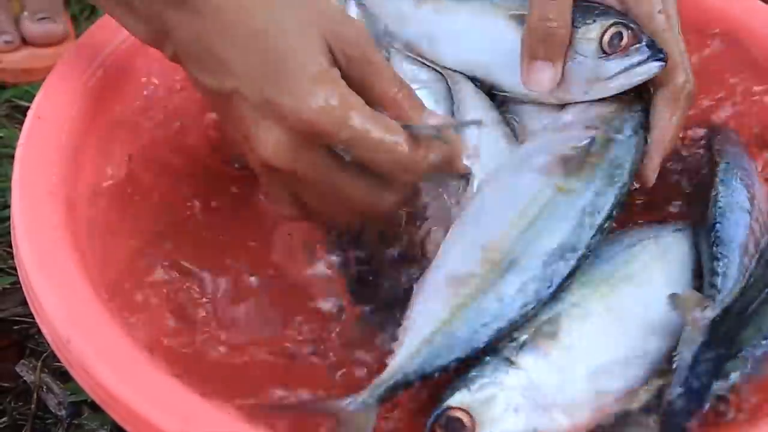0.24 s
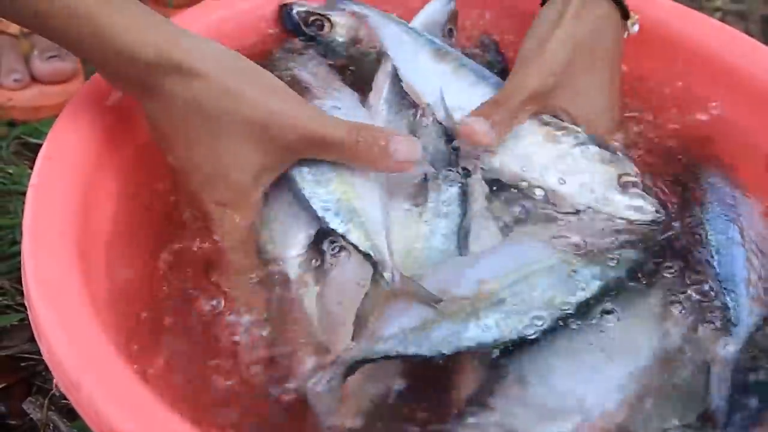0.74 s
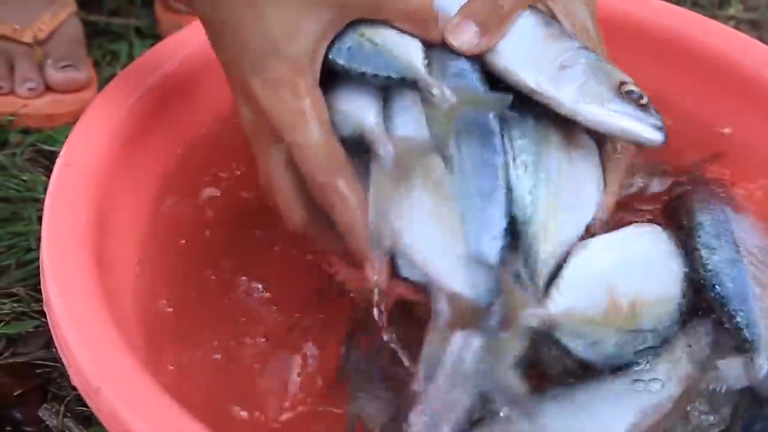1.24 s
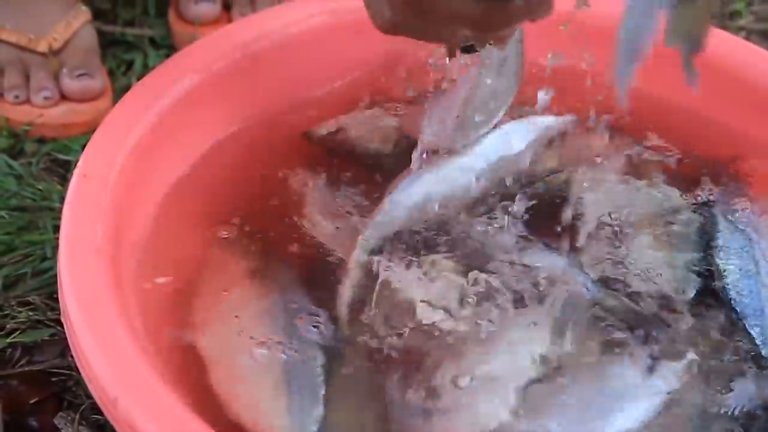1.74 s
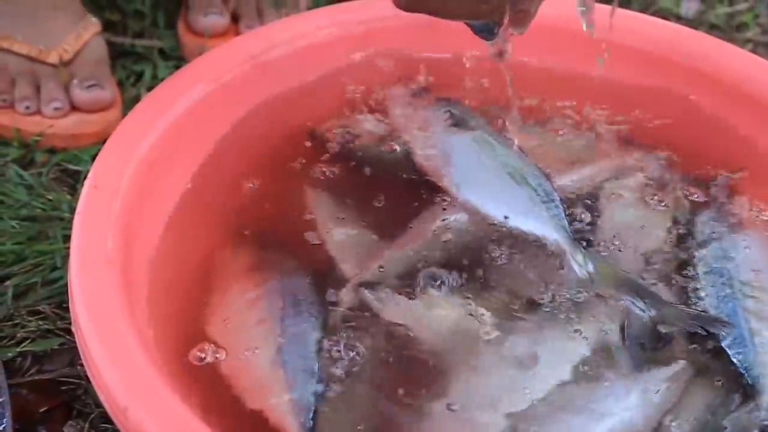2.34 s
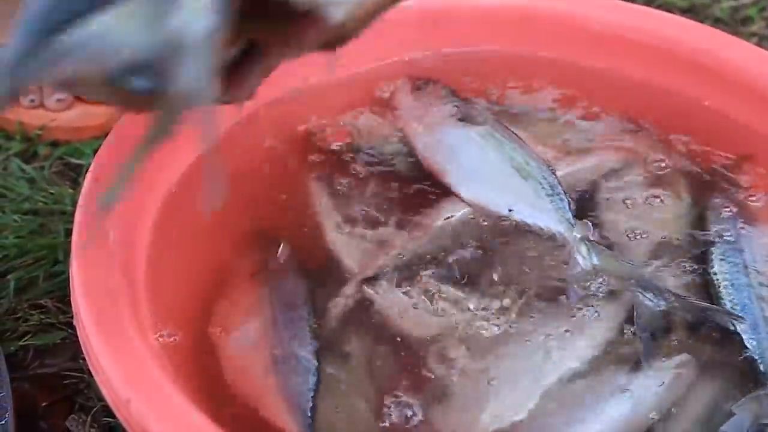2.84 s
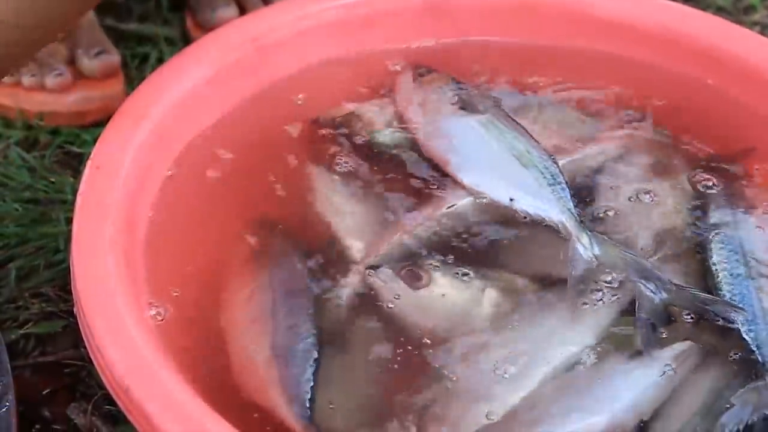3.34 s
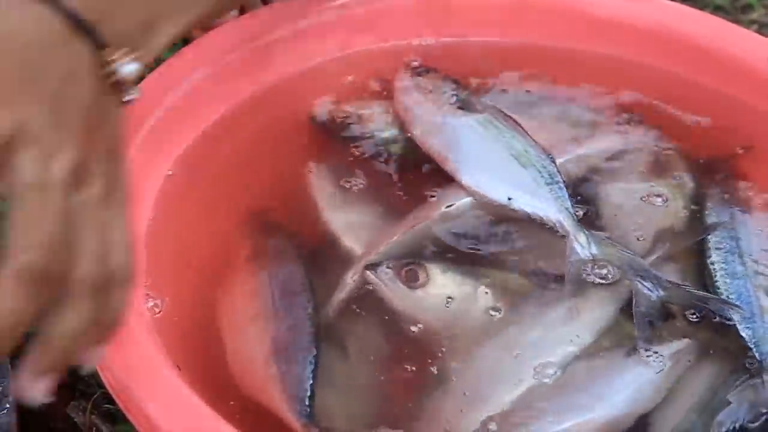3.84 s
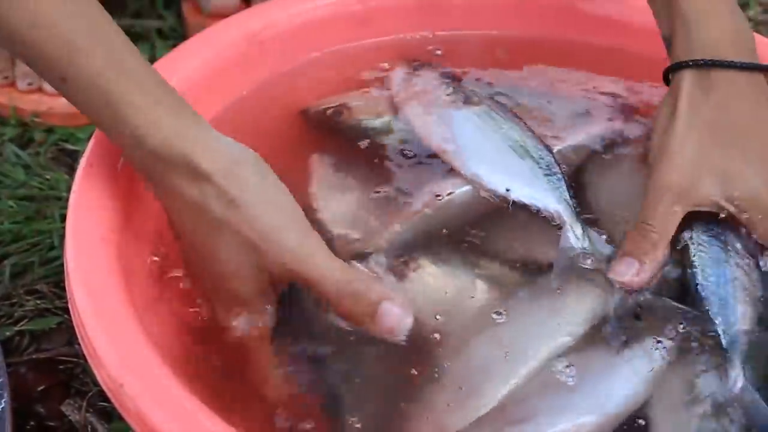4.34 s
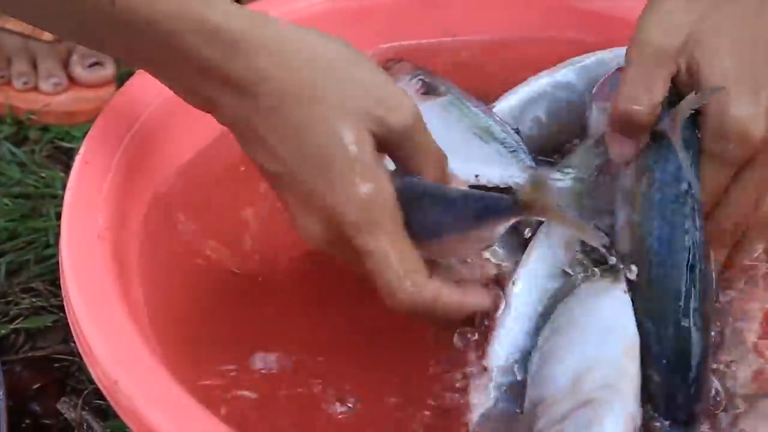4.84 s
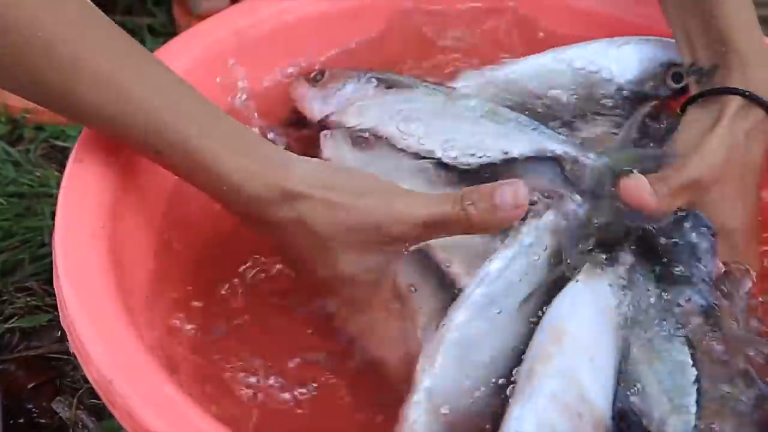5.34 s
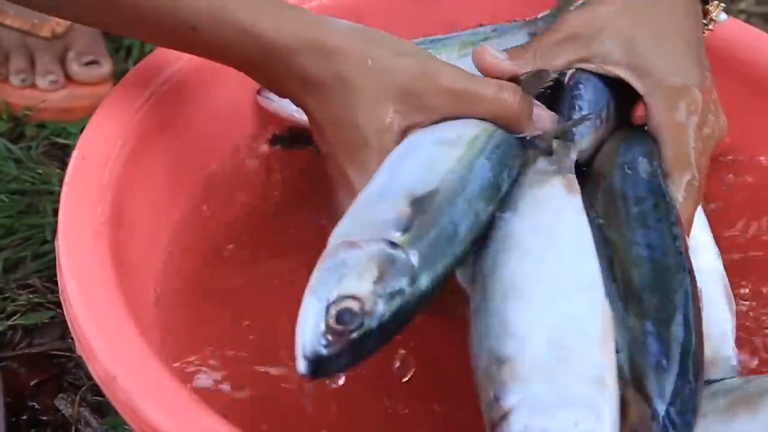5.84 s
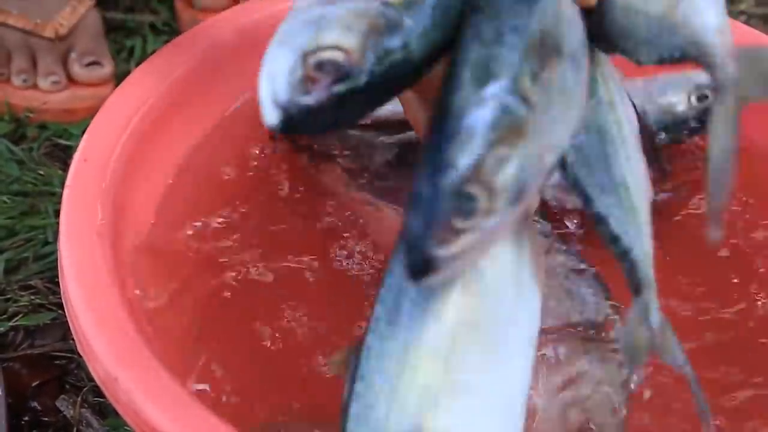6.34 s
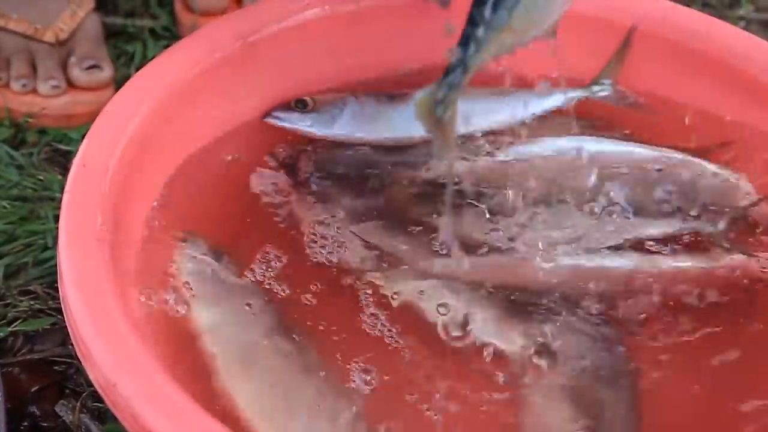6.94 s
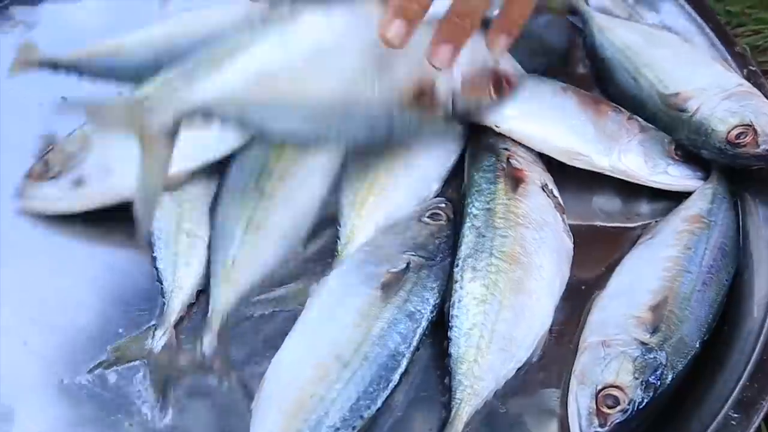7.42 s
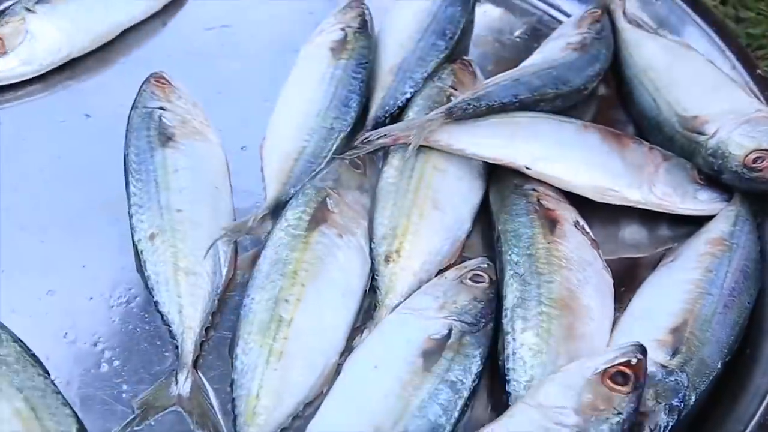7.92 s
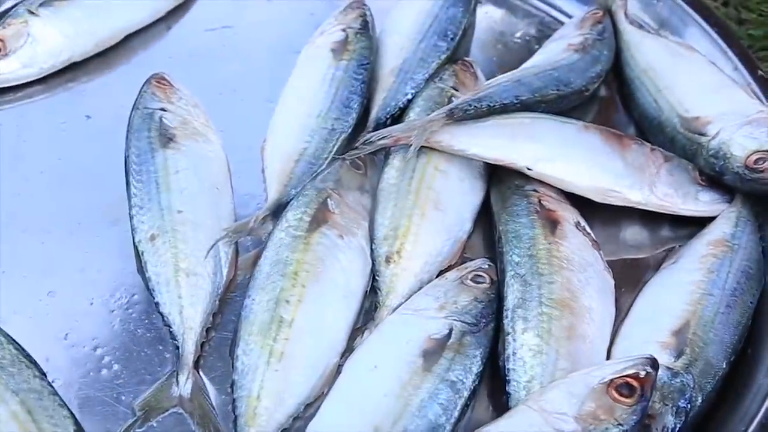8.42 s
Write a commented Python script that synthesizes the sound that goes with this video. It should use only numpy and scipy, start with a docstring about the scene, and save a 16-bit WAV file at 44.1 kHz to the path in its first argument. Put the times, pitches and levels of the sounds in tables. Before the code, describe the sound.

Close, dry outdoor sound with soft hiss and lumpy low wind rumble. From 0 to 2.2 s hands work wet fish through water in a plastic basin: busy gurgles, swishes, short bubble plops mostly rising in pitch, and sharp droplet ticks. It thins to small drips and fizz by 2.8 s. Around 3.5 to 3.9 s a handful of fish lands on a steel tray, dull wet thuds with faint metal ring. Washing resumes near 4.2 s, densest from 4.7 to 5.9 s, with snappy splashes at 6.2 and 6.7 s, then easing. Sound drops nearly silent at 7.15 to 7.23 s. From 7.45 to 7.8 s harder fleshy slaps hit the tray, the strongest at 7.55 s, with spatter. Wet slithering, a few small bubbles and stronger wind buffeting finish by about 8.7 s. Tiny hoarse bird chirps sound far off, clearest near 8 s.

```python
"""Outdoors, hands wash fish in a plastic basin: air pockets ring, most rising in pitch, and droplets tick.
Dense small chirps make the water gurgle and fizz; noise gives its swish, spray and foam.
Twice a handful of wet fish lands on a steel tray: dull thuds and wet noise, with a faint metal ring.
Wind buffets the microphone in low noise over a soft hiss, and gliding tones make far-off bird calls.
The sound drops out for a moment before the last part."""
import sys
import numpy as np
from scipy import signal
from scipy.io import wavfile

SR = 44100
rng = np.random.default_rng(int(sys.argv[2]) if len(sys.argv) > 2 else 0)


def unload_wav(signal):
    """Save mono or channel-first audio to the path in sys.argv[1] as 16-bit WAV at rate SR, clipped to [-1, 1]."""
    wavfile.write(
        sys.argv[1],
        SR,
        np.round(np.clip(np.atleast_2d(signal).T, -1, 1) * 32767).astype(np.int16),
    )


def volts_from_decibels(level):
    """Turn decibel levels (scalar or array-like) into linear amplitude factors."""
    exponent = np.asarray(level, float) / 20
    return 10 ** exponent


N = 382788


def noise():
    """White noise as long as the scene."""
    return rng.standard_normal(N)


def unit(x):
    """Scales a sound to an rms of 1."""
    return x / np.sqrt(np.mean(x ** 2) + 1e-20)


def band(x, low_hz, high_hz, order=2):
    """Keeps the part of a sound between two frequencies."""
    edges_hz = [low_hz, min(high_hz, 0.45 * SR)]
    return signal.sosfilt(signal.butter(order, edges_hz, "band", fs=SR, output="sos"), x)


def drift(rate_hz):
    """Slow random wandering of rms 1: noise through a two-pole lowpass, worked out every 40 samples."""
    pole = np.exp(-2 * np.pi * rate_hz * 40 / SR)
    settle = 2000
    slow = signal.lfilter([1], [1, -2 * pole, pole ** 2], rng.standard_normal(N // 40 + 2 + settle))[settle:]
    return np.interp(np.arange(N) / 40, np.arange(len(slow)), unit(slow))


def add(out, start_s, piece):
    """Mixes a short sound into a longer one, cut off at the end."""
    at = int(start_s * SR)
    out[at:at + len(piece)] += piece[:N - at]


def sweep(pitch_hz):
    """A sine that follows a changing pitch: its phase is the running sum of the pitch."""
    return np.sin(2 * np.pi * np.cumsum(pitch_hz) / SR)


def swells(rows, rise_db_s, fall_db_s, rest_db, upper_rest_db):
    """Each event rises, holds and falls above a resting level; gives gains for a main and an upper layer."""
    t = np.arange(0, N, 40) / SR
    start, hold, db, above_db = np.transpose(rows)[:, :, None]
    rise = rise_db_s * np.maximum(start - t, 0)
    fall = fall_db_s * np.maximum(t - start - hold, 0)
    shape = db - rise - fall
    gains = []
    for level, rest in ((shape, rest_db), (shape + above_db, upper_rest_db)):
        power = volts_from_decibels(2 * rest) + volts_from_decibels(2 * level).sum(axis=0)      # overlapping events add in power
        gains.append(np.interp(np.arange(N) / SR, t, np.sqrt(power)))
    return gains


def air():
    """Soft outdoor hiss: half-octave noise bands, each wavering a little."""
    # shape of the hiss: (pitch_hz, relative level_db per hz)
    hiss_shape = [(200, 6), (420, 3), (630, -2.5), (1330, -6), (2500, -14.5), (5500, -14), (8600, -18.5),
                  (10500, -22), (16000, -18)]
    hz, db = np.transpose(hiss_shape)
    edges_hz = 200 * 2 ** np.arange(0, 6.6, 0.5)
    white = rng.standard_normal((2, N))      # neighbouring bands take turns
    out = 0
    for k, (low, high) in enumerate(zip(edges_hz, edges_hz[1:])):
        level = np.interp(np.log(low * high) / 2, np.log(hz), db) + 0.8 * drift(3.9)
        out = out + volts_from_decibels(level) * band(white[k % 2], low, high)
    return volts_from_decibels(-51) * unit(out)


def wind():
    """Gusts on the microphone are lumpy low noise: a deep buffet and a faster flutter."""
    # gusts: (start_s, hold_s, buffet level_db, flutter level_db above the buffet)
    gusts = [(0, 0.013, -36, -5), (.58, 0.034, -31.5, -21.5), (1.14, 0.076, -29, -20),
             (1.41, 0.035, -32.5, -10), (1.69, 0.049, -23.5, -25), (1.9, 0.22, -25, -21.5),
             (2.37, 0.12, -21.5, -23), (2.6, 0.067, -23.5, -23.5), (2.98, 0.024, -22, -51),
             (3.19, .06, -20, -4), (3.27, 0.088, -14.5, -49), (3.53, 0.069, -25, -7),
             (3.72, 0.15, -24, -26), (4.06, 0.05, -25.5, -34), (4.24, 0.15, -23, -25.5),
             (4.5, 0.036, -29, -11), (4.63, 0.14, -24, -18), (4.92, 0.11, -28, -22),
             (5.13, 0.03, -21, -22.5), (5.25, 0.098, -25, -39), (5.44, .25, -25.5, -25.5),
             (5.78, .15, -23, -41), (6.04, 0.066, -26.5, -29), (6.57, .04, -30, -15),
             (6.84, 0.21, -23.5, -11.5), (7.12, .03, -29, -9), (7.36, 0.17, -20, -8.5),
             (7.69, 0.13, -19.5, -4), (7.92, 0.12, -22, -9), (8.1, .1, -18.5, -6), (8.37, 0.18, -24, -5.5),
             (8.64, 0.047, -21, -12)]
    gusting, fluttering = swells(gusts, rise_db_s=219, fall_db_s=141, rest_db=-42, upper_rest_db=-48.5)
    deep = band(band(noise(), 20.4, 28.7, order=1), 7.4, 113.4) * volts_from_decibels(2.4 * drift(23))
    flutter = band(band(noise(), 52, 134), 38, 246) * volts_from_decibels(3.0 * drift(15))
    return gusting * unit(deep) + fluttering * unit(flutter)


def small_bubbles(per_s, low_hz, octaves, tilt_db, spread_db, clump_db, climb, count):
    """Countless small air pockets, each a short rising chirp, born in clumps; rms 1."""
    out = np.zeros(N)
    crowd = volts_from_decibels(clump_db * drift(20))
    for at, keep, size, key, life, haste in rng.random((count, 6)):
        if keep * count < per_s * crowd[int(at * N)] * N / SR:
            hz = low_hz * 2 ** (octaves * key)
            cycles = 12 + 55 * life ** 1.5      # cycles until 60 dB down
            t = np.arange(int(cycles / hz * SR)) / SR
            pitch = hz * 2 ** (climb * haste ** 2 * hz * t)
            size_db = -spread_db * np.log(size + 0.0073)      # a few are much louder
            height = volts_from_decibels(size_db - 60 * t * hz / cycles + tilt_db * key)
            add(out, at * N / SR, height * sweep(pitch))
    return unit(out)


def crackle():
    """Separate spits of spray: each opens a dying puff of noise in one of three treble ranges; rms 1."""
    per_s, t60_s = 330, 0.0061
    sizes = volts_from_decibels(6.0 * np.minimum(rng.exponential(1, N), 4))
    born = rng.random(N) < per_s * volts_from_decibels(7.5 * drift(30)) / SR
    dealt = rng.integers(0, 3, N)
    fade = volts_from_decibels(-60 / (t60_s * SR))
    out = 0
    for k, (low_hz, high_hz, db) in enumerate([(3750, 9100, -4.5), (6500, 9250, 3.0), (7860, 18400, -3.5)]):
        puffs = signal.lfilter([1], [1, -fade], sizes * born * (dealt == k) + 1e-18)
        out = out + volts_from_decibels(db) * unit(band(puffs * noise(), low_hz, high_hz))
    return unit(out)


def stirred_water():
    """Small bubbles gurgle over a soft swish; tiny ones fizz among spits of spray and a thin hiss of foam."""
    # strokes of the hands through water or among wet fish:
    # (start_s, hold_s, gurgle level_db, fizz level_db above the gurgle)
    strokes = [(.06, 0.069, -39, -5.5), (.18, 0.08, -35.5, 1.5), (.37, 0.05, -35.5, 0.5),
               (.53, 0.14, -34.5, -8.5), (.87, 0.56, -50, -2), (1.2, .18, -40.5, -8.5),
               (1.42, 0.19, -38, 1), (1.74, 0.12, -44, 3), (2, 0.18, -46, -1.5), (2.36, 0.07, -54.5, 7.5),
               (2.52, 0.061, -47.5, -8), (2.8, 0.055, -59.5, 10), (3.15, .2, -53, -6),
               (3.53, 0.096, -35.5, -17.5), (3.78, .06, -46, -4), (4.2, .22, -38.5, -13),
               (4.55, 0.14, -46, -8), (4.75, 0.11, -32, -3.5), (5.03, 0.099, -32.5, -11),
               (5.3, 0.18, -40.5, -4), (5.57, 0.14, -36.5, -1), (5.72, 0.13, -38, -13),
               (5.97, .2, -43.5, -12.5), (6.29, 0.16, -35.5, -7), (6.7, 0.051, -45, 8.5),
               (7.08, 0.21, -47, 0.5), (7.27, 0.07, -52, 1), (7.46, 0.12, -36, -5), (7.7, 0.24, -47.5, -3),
               (7.88, 0.18, -42.5, -1), (8.19, 0.13, -32, -17), (8.4, 0.2, -35.5, -12)]
    # hands in the water: (start_s, end_s)
    washing = [(0, 2.8), (4.16, 7.2)]
    gurgling, fizzing = swells(strokes, rise_db_s=230, fall_db_s=108, rest_db=-66, upper_rest_db=-54.5)
    gurgle = small_bubbles(560, low_hz=800, octaves=2.256, tilt_db=5.5, spread_db=6.0,
                           clump_db=4.0, climb=0.0325, count=9000)
    swish = volts_from_decibels(-11 + 7.8 * drift(28.3)) * unit(band(noise(), 770, 2340, order=1))
    fizz = small_bubbles(520, low_hz=1935, octaves=2.16, tilt_db=7.5, spread_db=6.5,
                         clump_db=4.0, climb=0.017, count=12000)
    foam = volts_from_decibels(-20) * unit(band(noise(), 2300, 5800, order=1))
    t = np.arange(N) / SR
    hands = sum((t >= start) & (t < end) for start, end in washing)
    # away from the water, fish slither on the wet tray
    slide = (1 - hands) * unit(band(noise(), 2300, 3670, order=1))
    low = hands * gurgle + swish
    high = volts_from_decibels(-5.5) * crackle() + hands * fizz + foam + volts_from_decibels(-5) * slide
    return gurgling * low + fizzing * high


def bubbles():
    """Air pockets ring up within half a cycle; most climb in pitch near the surface, where they burst."""
    # the larger air pockets caught in the water:
    # (start_s, level_db before fading, pitch_hz at the start, t60_s to fade 60 dB, rise in octaves per s)
    pockets = [(.023, -26, 1470, 0.026, 5.5), (.0505, -20, 2400, 0.021, 30), (0.0572, -24, 898, .12, 28.5),
               (.0694, -18, 1244, 0.07, -3), (0.0806, -19, 977, 0.076, 6), (0.1515, -16.5, 1800, 0.024, 58),
               (.168, -29, 797, 0.12, -2), (.202, -25, 553, 0.16, 14), (0.2032, -12, 1212, 0.075, 6.5),
               (.218, -23, 1185, 0.1, 13), (0.225, -19, 2660, .021, 41), (.229, -14.5, 1990, .034, 2),
               (0.2374, -9, 2960, .0032, 0), (0.249, -23, 965, 0.11, -1.5), (.338, -30.5, 800, 0.083, 16),
               (.3648, -23.7, 2580, .021, 18), (.3755, -21, 3460, .01, 78), (0.3957, -22, 2140, .027, 17),
               (0.406, -20, 1330, 0.029, -2), (0.4273, -17.5, 1100, 0.055, 42),
               (.434, -17, 1110, 0.025, 31), (0.5156, -30, 1116, .025, 2), (.517, -22, 2290, .02, -2),
               (.5401, -17.5, 4166, .0083, 92), (.5695, -24.5, 660, 0.13, 1), (.581, -13, 1940, 0.0092, 6),
               (0.589, -17, 1162, 0.034, 9), (.5908, -30.5, 668, 0.3, 4.5), (.6275, -13, 3246, .004, 0),
               (.67, -18, 1680, .018, 12), (0.6755, -23, 1280, .039, 32), (.681, -6, 2750, .021, 29),
               (.73, -26, 1280, 0.039, 38), (0.785, -26, 645, 0.038, -1), (0.9827, -7.5, 1260, 0.0017, 0),
               (1.0584, -29.5, 1060, .053, 31), (1.091, -24.5, 1960, 0.017, 6),
               (1.1696, -15, 1710, 0.015, 46), (1.186, -25, 2140, 0.018, 4), (1.2415, -22, 2285, 0.021, 0),
               (1.2432, -10, 840, 0.013, 3), (1.266, -15.5, 1060, 0.032, -16),
               (1.29, -17.5, 1430, 0.029, 2), (1.35, -21, 704, .02, -2), (1.367, -22.5, 660, 0.049, 21),
               (1.3813, -19, 1180, 0.017, 2), (1.3892, -25, 1100, .045, 4), (1.411, -26, 746, .084, 7),
               (1.4345, -25, 3085, .018, 42), (1.4466, -17.5, 3400, 0.017, 0), (1.501, -22, 1318, .02, 5),
               (1.5176, -23, 1793, .019, 20), (1.52, -13, 1005, 0.035, -8), (1.5493, -26, 1034, 0.11, 24),
               (1.556, -14.5, 2770, 0.012, -16), (1.5708, -11.5, 1430, 0.01, 0),
               (1.611, -15.5, 2746, 0.012, 5), (1.645, -20.5, 1030, 0.028, -5),
               (1.662, -10.5, 2650, .0068, 0), (1.74, -19.5, 3900, 0.016, -1),
               (1.7634, -20, 1180, .026, 47), (1.7774, -22, 1990, .033, 19),
               (1.7905, -14.5, 1880, 0.012, 0), (1.7878, -12.5, 1505, 0.032, 9),
               (1.8216, -26.5, 1053, 0.15, 15), (1.842, -13.5, 2760, .011, 17),
               (1.8456, -22, 1460, .026, 55), (1.913, -23, 1590, .061, -2.5), (1.932, -28, 600, .013, 0),
               (2.001, -32, 2020, .033, -6), (2.0301, -14.7, 1290, 0.054, 66),
               (2.0586, -21.5, 860, 0.13, 5.5), (2.0771, -26.7, 888, 0.16, 26),
               (2.1376, -20, 960, 0.074, 7), (2.1517, -19, 4500, .01, 0), (2.1668, -18.5, 930, .12, 10.5),
               (2.2409, -19, 3350, 0.02, 2), (2.45, -24.5, 1630, 0.019, 0), (2.4644, -30.5, 1374, 0.043, 7),
               (2.5214, -21, 2780, 0.028, 88), (2.522, -25.5, 1285, 0.034, 6),
               (2.5447, -25, 1240, 0.052, 10), (2.588, -23.5, 1147, 0.052, 8),
               (2.5946, -29, 1456, 0.059, -2), (2.636, -40, 1190, 0.065, 3), (2.638, -29, 3370, 0.017, 20),
               (4.1839, -5.5, 850, .0075, -6), (4.3958, -12.5, 1481, 0.0067, 4),
               (4.404, -9, 2381, 0.0015, 0), (4.4195, -8.5, 3382, 0.003, 44), (4.44, -21, 1413, 0.054, 25),
               (4.444, -16, 2460, .02, 67), (4.4534, -21, 1950, .042, 43), (4.6545, -12, 2180, 0.0069, -4),
               (4.6722, -26, 1870, 0.061, 0), (4.6987, -15, 2300, 0.0084, 117),
               (4.7369, -21, 1820, .028, -3), (4.744, -18, 2640, 0.021, 26), (4.7515, -14.5, 2800, .015, 4),
               (4.752, -23, 800, .07, 1), (4.753, -19, 1597, .022, -5), (4.761, -22, 1100, .047, 22),
               (4.781, -13, 1650, .013, 0), (4.7897, -20, 813, .18, 6.5), (4.863, -21, 2150, 0.06, 19),
               (4.8675, -17, 4870, .017, 15), (4.8812, -22, 950, .044, 25), (4.9046, -22, 1740, .051, 3),
               (4.919, -21.5, 1384, 0.064, 66), (4.98, -24, 1390, .034, 0), (5.017, -21.5, 464, 0.041, 1),
               (5.0352, -17, 840, 0.062, 11), (5.038, -2, 3050, 0.0057, 62),
               (5.0445, -11.5, 4480, 0.019, -5), (5.066, -17.5, 904, 0.048, 27),
               (5.0655, -19, 2014, 0.035, 23), (5.0955, -8, 1740, .008, 2), (5.0963, -12.5, 2530, .019, 35),
               (5.14, -18, 1970, 0.053, 55), (5.1537, -5, 2961, .0041, 0), (5.1599, -10.5, 1134, 0.029, 18),
               (5.175, -18, 1510, 0.036, 55), (5.227, -26.5, 1490, 0.04, 5), (5.3607, -29, 1710, .052, 1),
               (5.453, -17, 1090, 0.082, 50), (5.573, -2.5, 3180, .0079, 29), (5.573, -12, 4120, 0.014, 17),
               (5.6258, -10, 1560, 0.008, -2), (5.6433, -16.5, 1166, 0.054, -9),
               (5.6541, -9, 2250, 0.027, -3), (5.661, -18, 1440, .03, 0), (5.6805, -10, 1560, 0.042, 9.5),
               (5.6954, -22, 1370, .047, 25), (5.704, -16, 1340, 0.066, 4), (5.748, -13, 2172, 0.014, 76),
               (5.7525, -23, 1400, 0.075, 2), (5.7694, -7, 910, 0.011, 3), (5.7892, -18, 1540, 0.052, -4.5),
               (5.8063, -20.5, 1260, 0.084, 28), (5.8409, -15.5, 1110, 0.048, -4),
               (5.843, -16, 1940, .026, 3), (5.849, -26, 1503, 0.095, 1.5), (5.9, -30, 1300, .06, -2),
               (5.98, -33, 1220, 0.021, -2), (6.0487, -21, 4680, .014, -7), (6.0631, -20, 2960, 0.029, -6),
               (6.1983, -19, 690, 0.034, 0), (6.2016, -9, 2930, 0.0048, 0), (6.2047, -7, 5000, .0045, 177),
               (6.2995, -16, 2850, .0087, 63), (6.3135, -12.5, 1930, .0063, 101),
               (6.3307, -21.5, 800, 0.029, 9), (6.377, -16.5, 524, 0.026, -6),
               (6.4032, -20, 3900, 0.017, -8), (6.4266, -7.5, 1182, .05, 7.5),
               (6.4333, -13.5, 1157, 0.079, -1), (6.452, -19, 1090, 0.085, -0.5),
               (6.667, -32, 1265, .12, 1), (6.717, -17, 4460, .012, 7), (6.7293, -5.5, 2010, .01, 7),
               (6.7302, -7.5, 510, 0.017, -20), (6.7317, -1, 1030, 0.0024, 4),
               (6.774, -19.5, 410, 0.045, -15), (6.8216, -22.5, 4040, .018, 6),
               (7.018, -23.5, 2490, .03, -11), (7.082, -25.5, 1410, 0.052, -4.5),
               (8.185, -25.5, 1180, .035, 42), (8.1928, -15, 1250, 0.0099, 7), (8.1925, -26, 784, 0.048, 0),
               (8.2136, -27.5, 1260, 0.091, 4), (8.216, -26.5, 1880, .027, 62),
               (8.436, -17.5, 763, 0.025, -2), (8.4457, -23, 840, .021, 3), (8.5491, -5.5, 1901, 0.0012, 0),
               (8.6447, -33, 1046, 0.069, 11.5), (8.659, -30, 1664, 0.023, 5)]
    out = np.zeros(N)
    for start, db, hz, t60, rise in pockets:
        t = np.arange(int(t60 * SR)) / SR
        octaves = np.minimum(rise * t, 1.5)
        burst_db = 3 * octaves ** 2      # extra fading as the pitch moves away
        level = volts_from_decibels(db - 60 * t / t60 - burst_db) * np.minimum(2 * hz * t, 1)
        add(out, start, level * sweep(hz * 2 ** octaves))
    return out


def ticks():
    """A droplet bursts: a broad snap and a brief coloured hiss, both of dying noise."""
    # the louder droplets: (start_s, level_db before the common trim below, colour_hz)
    droplets = [(0.0677, -18.5, 13100), (0.187, -18, 5130), (0.215, -18, 7320), (0.2977, -19, 7560),
                (0.3645, -16.5, 5040), (0.436, -10, 5400), (0.4984, -22, 8600), (0.5166, -19, 5130),
                (0.573, -17, 6600), (0.617, -12, 7840), (0.6262, -12, 4900), (0.636, -14.5, 6130),
                (0.7592, -25, 5570), (0.8145, -25, 8400), (1.1032, -22, 9700), (1.38, -18, 7460),
                (1.4509, -11.5, 7590), (1.5224, -14, 6600), (1.5554, -12.5, 7210), (1.5712, -18, 6910),
                (1.5897, -14, 5700), (1.661, -23, 7840), (1.708, -14.5, 5400), (1.7384, -18.5, 7900),
                (1.7764, -16, 8350), (1.9008, -18, 6200), (1.981, -18, 5240), (2.2066, -20, 8200),
                (2.3192, -25, 7160), (2.378, -23, 12700), (2.4119, -23.5, 6900), (2.5202, -30, 7280),
                (2.5435, -27.5, 8950), (2.599, -25, 13000), (2.779, -30, 5230), (2.804, -33, 8500),
                (2.977, -32, 9020), (3.1627, -30, 13000), (3.3543, -35, 5730), (3.547, -23, 7520),
                (3.5644, -18, 8950), (3.6442, -12.5, 9200), (3.799, -18.5, 5280), (3.8207, -16, 7360),
                (4.1832, -14.5, 4960), (4.35, -18.5, 6900), (4.543, -24.5, 6500), (4.6513, -15, 5840),
                (4.736, -22, 5220), (4.816, -7.5, 7000), (4.8683, -11.5, 4970), (4.9185, -19.5, 7470),
                (5.0145, -16.5, 5410), (5.0305, -8, 9000), (5.0374, -7, 7250), (5.054, -20, 8200),
                (5.075, -15.5, 8300), (5.1312, -11.5, 8100), (5.1569, -11, 5180), (5.295, -10, 7080),
                (5.447, -16.5, 8900), (5.5702, -20, 7760), (5.598, -17, 13000), (6.037, -20, 5100),
                (6.1987, -2.5, 5760), (6.315, -17, 6930), (6.3273, -15.5, 8100), (6.3965, -17, 6670),
                (6.7187, -10, 5100), (6.773, -6, 7150), (6.8528, -12.5, 7070), (6.9618, -23.5, 8200),
                (7.115, -19, 6800), (7.448, -7, 6100), (7.5552, -2.5, 8700), (7.6273, -16, 6340),
                (7.7163, -14, 11700), (7.7666, -8.5, 9000), (8.0915, -43, 5540), (8.2616, -24, 8000),
                (8.316, -16.5, 8800), (8.3627, -14.5, 13700), (8.6547, -17.5, 8300)]
    t60_s, trim_db, edge_db, width = 0.019, -8.5, -8.5, 1.25      # width: ratio of band edge to centre
    out = np.zeros(N)
    t = np.arange(900) / SR
    fade = volts_from_decibels(-60 * t / t60_s)
    for start, db, hz in droplets:
        snap, hiss = rng.standard_normal((2, len(t)))
        colour = unit(band(hiss, hz / width, hz * width, order=1))
        broad = volts_from_decibels(edge_db) * unit(band(snap, 1800, 7300, order=1)) * fade      # fades twice as fast
        add(out, start, volts_from_decibels(db + trim_db) * fade * (colour + broad))
    return out


def birds():
    """Far calls: hoarse chirps of gliding pitch, and short level tones with soft ends."""
    # one call of a small bird, a warble and a falling note, as points along each note:
    # (time_s from the start of the fall, pitch_hz, level_db relative to the call)
    call_notes = [
        [(-.026, 5630, 0), (-.016, 4220, 5), (-.011, 5400, 1), (-.006, 4500, 6), (0, 5400, -2)],
        [(0, 4000, 17), (.01, 3570, 6.5), (.024, 3290, 3), (.046, 3100, 5)],
    ]
    # when the bird calls: (start_s of the fall, level_db of the call)
    calls = [(.905, -54.5), (2.468, -54), (2.681, -51.5), (6.612, -53.5), (7.978, -42.5)]
    # two far whistles, a soft hoot and a low thrum in a gust: (start_s, length_s, pitch_hz, level_db)
    level_tones = [(0.264, 0.14, 345, -42), (2.41, 0.074, 2680, -50), (2.832, 0.14, 2630, -49),
                   (8.118, 0.061, 145, -14.5)]
    out = np.zeros(N)
    waver = volts_from_decibels(-2 * drift(160))
    waver *= 1 + 0.73 * unit(band(noise(), 150, 580))      # hoarse side-bands
    for note in call_notes:
        s, hz, db = np.transpose(note)
        t = np.arange(s[0], s[-1], 1 / SR)
        tone = sweep(np.interp(t, s, hz)) * signal.windows.tukey(len(t), 0.3)
        for start, call_db in calls:
            add(out, start + s[0], volts_from_decibels(np.interp(t, s, db) + call_db) * tone)
    out *= waver
    for start, length, hz, db in level_tones:
        t = np.arange(0, length, 1 / SR)
        add(out, start, volts_from_decibels(db) * np.sin(2 * np.pi * hz * t) * signal.windows.tukey(len(t), 0.85))
    return out


def ring(push, hz, t60_s):
    """A resonance: a unit click sets a dying sine ringing."""
    pole, turn = volts_from_decibels(-60 / (t60_s * SR)), 2 * np.pi * hz / SR
    return signal.lfilter([0, np.sin(turn)], [1, -2 * pole * np.cos(turn), pole ** 2], push + 1e-18)


def slaps():
    """A push thuds in the flesh, water squelches and spatters out, and the wet push rings the tray."""
    # wet fish landing on the tray: (start_s, level_db of the blow, thud pitch_hz,
    # t60_s of the wet noise, spatter level_db on its own scale)
    landings = [(3.194, -44, 832, 0.058, -67), (3.512, -24, 517, 0.062, -38.5),
                (3.523, -21.5, 515, 0.064, -61), (3.547, -8, 756, 0.13, -34), (3.645, -24, 606, 0.14, -34),
                (3.672, -38, 1180, 0.041, -29), (3.771, -38, 799, 0.16, -47),
                (3.814, -17.5, 2220, 0.092, -40), (3.881, -32, 1180, 0.021, -51),
                (7.291, -31.5, 740, 0.026, -44), (7.449, -8, 553, 0.069, -23),
                (7.479, -10.5, 610, 0.064, -49), (7.548, 5.5, 595, 0.017, -28),
                (7.556, -5.5, 770, 0.068, -45), (7.628, -18.5, 549, 0.047, -34),
                (7.648, -18.5, 520, 0.049, -52), (7.718, -9, 750, 0.033, -41),
                (7.767, -10, 590, 0.032, -45), (7.862, -32, 1140, 0.087, -44)]
    # resonances of the steel tray: (pitch_hz, relative level_db, t60_s to fade 60 dB)
    tray_rings = [(547, -14, 0.35), (770, -15.5, 0.49), (840, -14, 0.2), (1180, -5, 0.26),
                  (1203, -10.5, 0.5), (1545, -30, .3), (2000, -35, 0.2), (2230, -30, 0.25),
                  (2580, -26, 0.33), (3480, -18.5, 0.22)]
    thud_cycles, squelch_db, ring_db = 13.4, -6.5, -49      # thud_cycles: cycles until 60 dB down
    out, shaking = np.zeros(N), np.zeros(N)
    t = np.arange(6000) / SR
    for start, db, hz, t60, spatter_db in landings:
        wet, spray = rng.standard_normal((2, len(t)))
        decay = volts_from_decibels(-60 * t / t60) * np.minimum(t / 0.0002, 1)
        thud = np.sin(2 * np.pi * hz * t) * volts_from_decibels(-60 * t * hz / thud_cycles) * np.minimum(2 * hz * t, 1)
        squelch = volts_from_decibels(squelch_db) * unit(band(wet, hz / 1.36, hz * 1.31, order=1)) * decay
        spatter = volts_from_decibels(spatter_db) * unit(band(spray, 2100, 6500, order=1)) * decay
        thump = volts_from_decibels(-16) * unit(band(wet, 244, 430, order=1)) * decay      # the whole tray gives
        add(out, start, volts_from_decibels(db) * (thud + squelch + thump) + spatter)
        add(shaking, start, volts_from_decibels(0.44 * db) * wet * decay)      # soft flesh passes on less of a hard blow
    for hz, db, t60 in tray_rings:
        uneven_db = 3.9 * drift(25)      # sliding fish damp the tray unevenly
        out += volts_from_decibels(db + ring_db + uneven_db) * ring(shaking, hz, t60)
    return out


def scene():
    """Mixes the weather, the water, the birds and the fish on the tray into one channel."""
    return (air() + wind() + stirred_water() + bubbles() + ticks() + birds() + slaps())[None]


def gain_control(x):
    """Loud blows pull the gain down within some ms; it climbs back within some tens of ms."""
    knee_db, share, release_db_s = -8.5, 0.33, 253      # share of the excess that is taken away
    fall = release_db_s * np.arange(N) / SR
    over_db = np.maximum(20 * np.log10(np.abs(x) + 1e-9) - knee_db, 0)
    held_db = np.maximum.accumulate(over_db + fall, axis=-1) - fall      # peaks, sinking steadily
    smooth_db = signal.lfilter([0.006], [1, -0.994], held_db)
    return x * volts_from_decibels(-share * smooth_db)


def band_limit(x):
    """A steep low-pass at the top of the band."""
    return signal.sosfilt(signal.butter(12, 16990, fs=SR, output="sos"), x)


def record(dry):
    """Gain control, a moment of near silence, a cut of the top treble, and peaks clipped at full scale."""
    # where the sound drops out: (start_s, end_s)
    dropout = (7.153, 7.231)
    t = np.arange(N) / SR
    mute = np.where((t > dropout[0]) & (t < dropout[1]), volts_from_decibels(-67), 1)
    top_cut = signal.cheby2(6, 24, 16800, fs=SR, output="sos")
    mix = signal.sosfilt(top_cut, gain_control(dry) * mute)
    return band_limit(np.clip(mix, -1, 1))


dry = scene()
out = record(dry)
unload_wav(out)
```